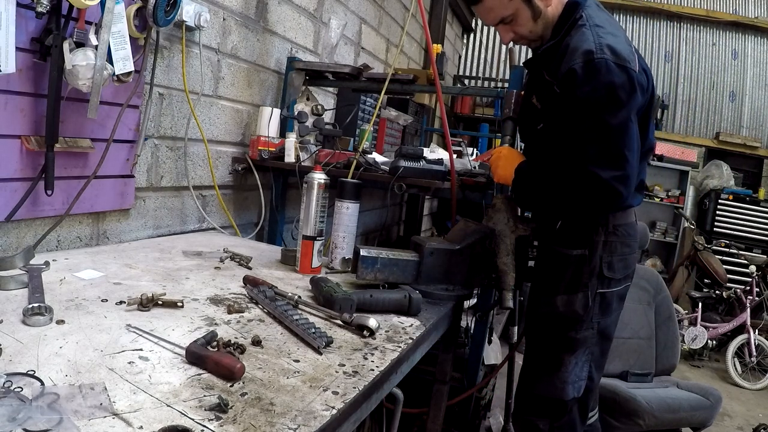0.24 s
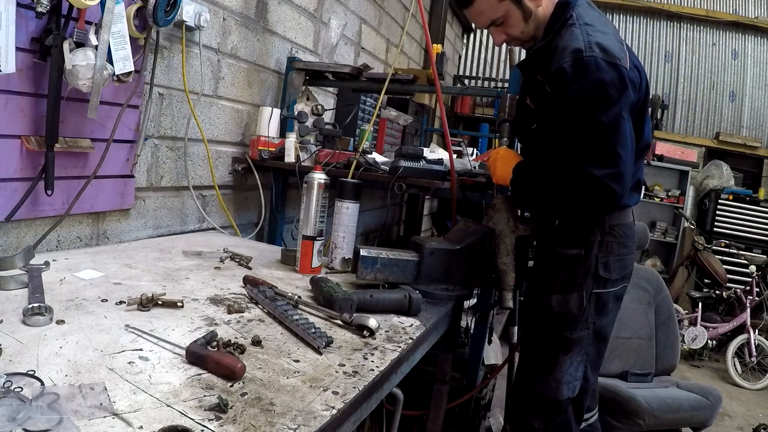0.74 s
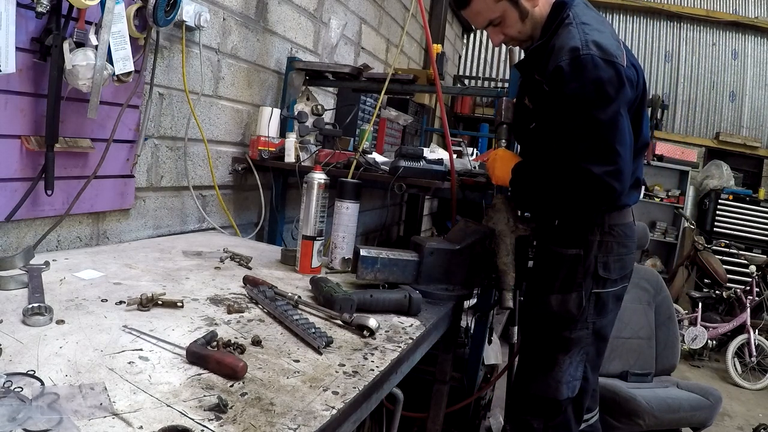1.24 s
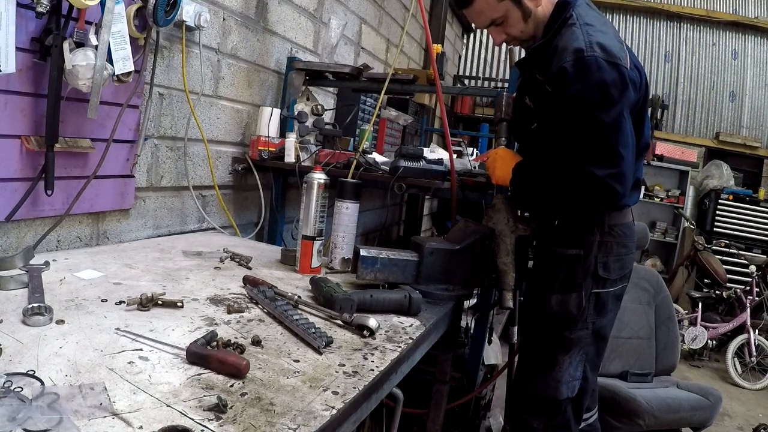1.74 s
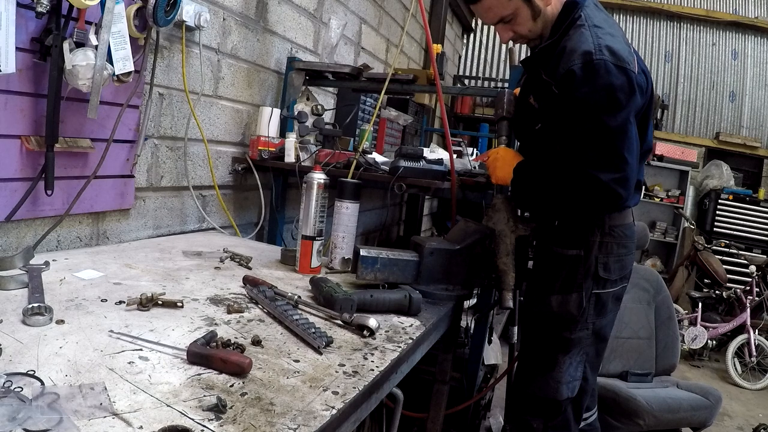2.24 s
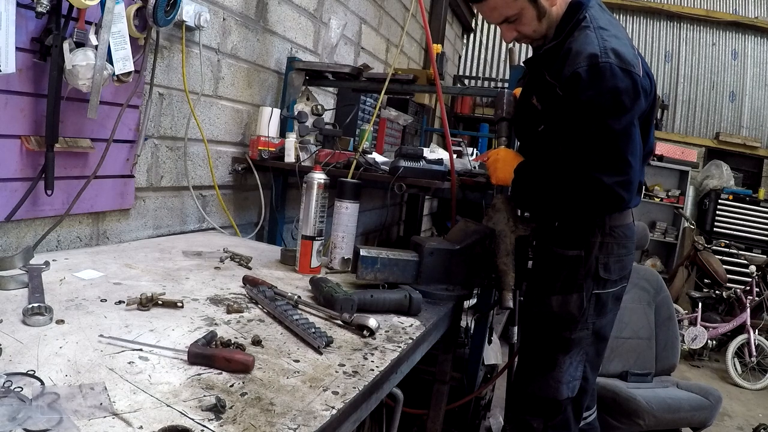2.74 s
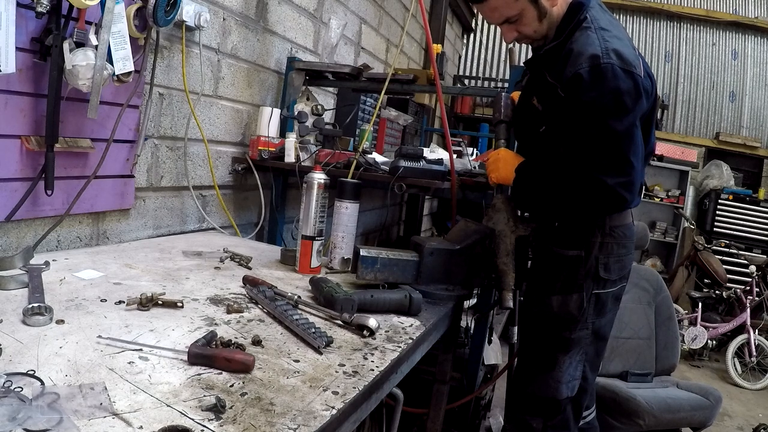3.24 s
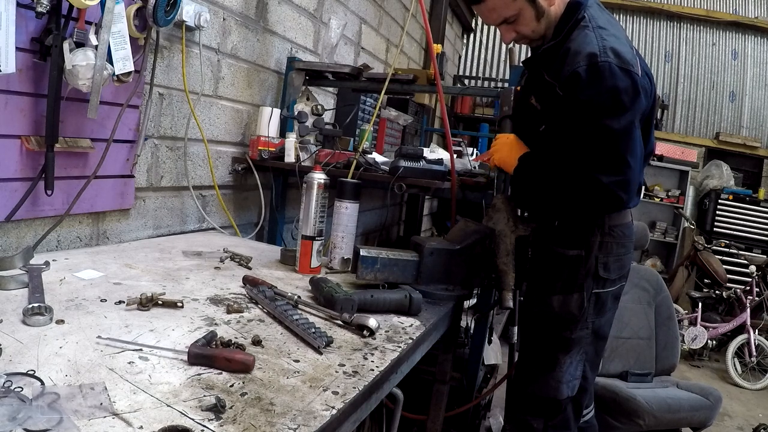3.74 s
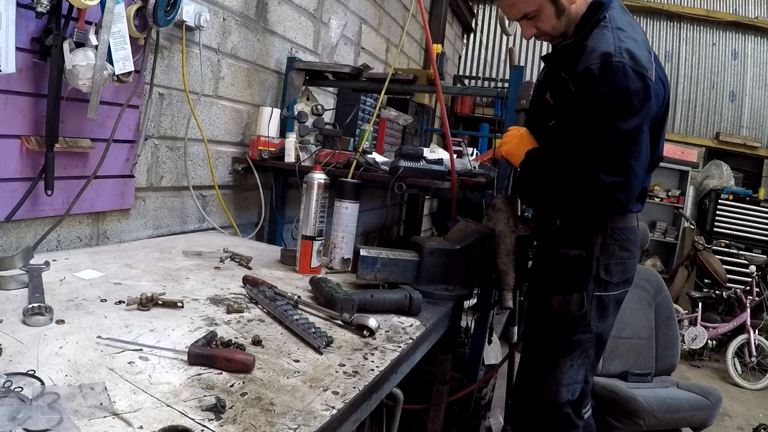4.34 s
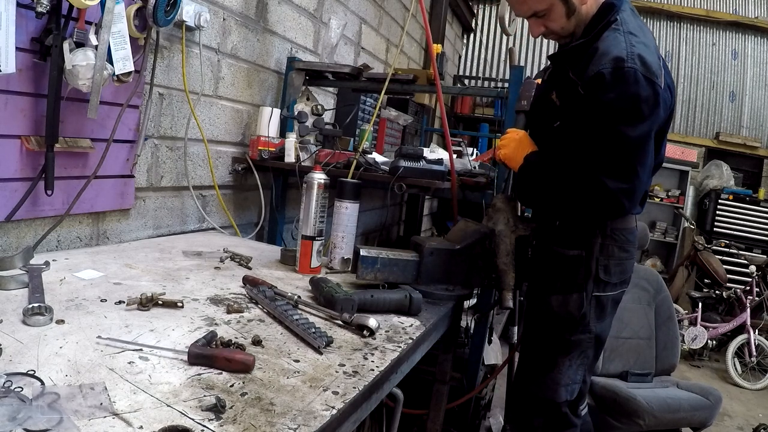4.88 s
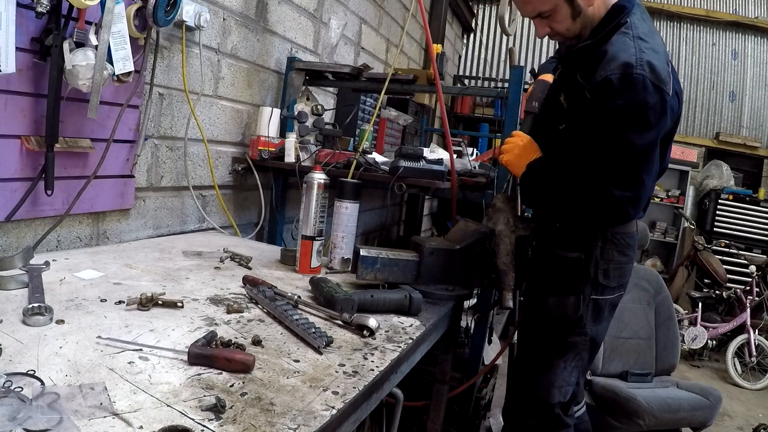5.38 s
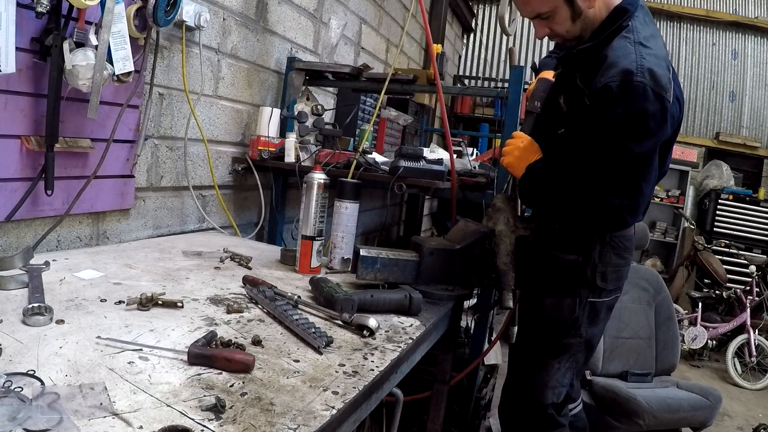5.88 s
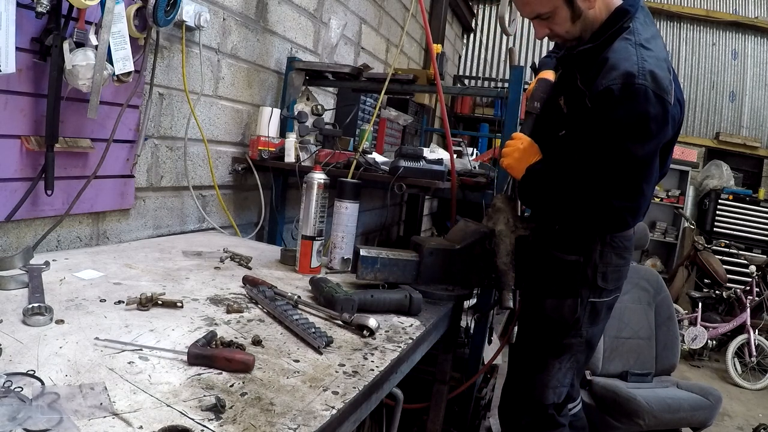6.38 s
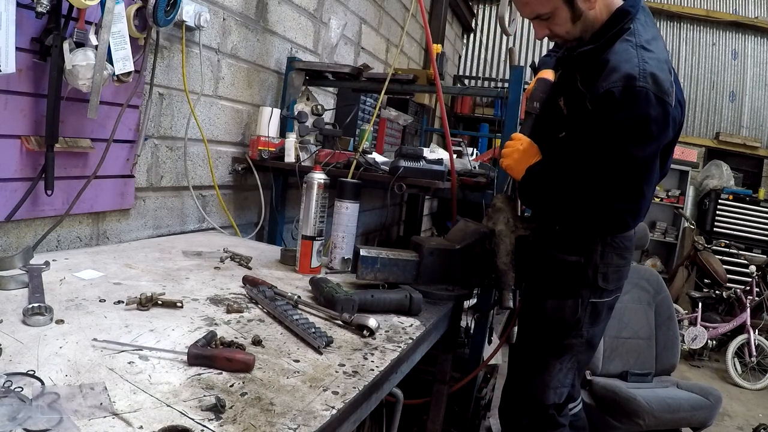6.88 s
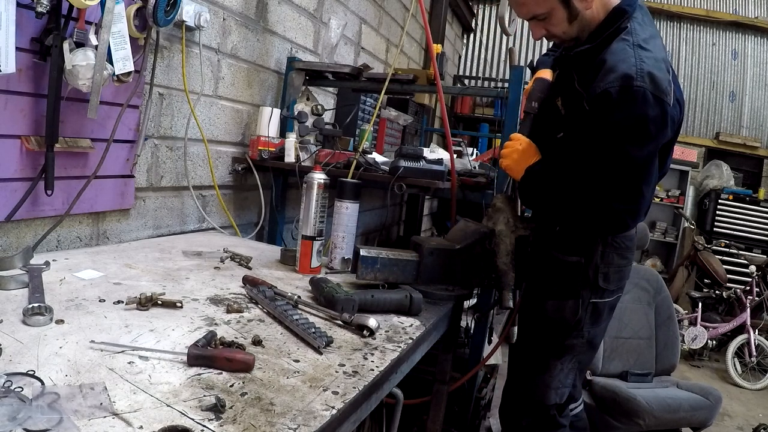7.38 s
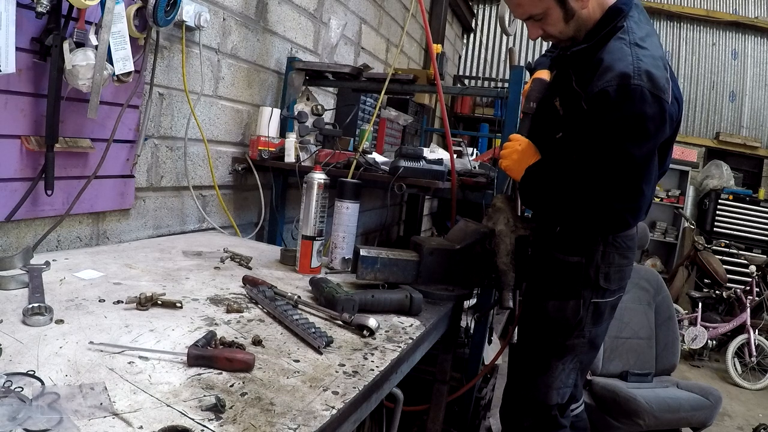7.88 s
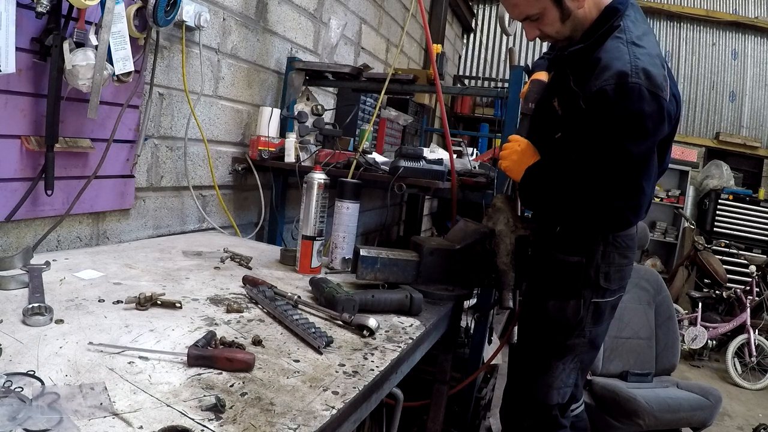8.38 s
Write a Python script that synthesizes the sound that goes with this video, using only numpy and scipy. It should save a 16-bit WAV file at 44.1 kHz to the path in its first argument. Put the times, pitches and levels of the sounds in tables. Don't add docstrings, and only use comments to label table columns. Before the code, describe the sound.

In a block-walled garage, a pneumatic chisel fires seven brief clanging bursts, rests while a compressor hums, then pounds steadily to the end.

```python
import sys
import numpy as np
from scipy import signal
from scipy.fft import rfft, irfft
from scipy.io import wavfile
from scipy.ndimage import uniform_filter1d

SR = 44100
rng = np.random.default_rng(int(sys.argv[2]) if len(sys.argv) > 2 else 0)


def invert_db(x):
    u = np.asarray(x, float) / 20
    return 10 ** u


def generate_wav(sig):
    pcm = np.round(np.clip(np.atleast_2d(sig).T, -1, 1) * 32767).astype(np.int16)
    wavfile.write(sys.argv[1], SR, pcm)


N = 380141
LEAD = 16384
SCATTER_DB = 2.27

# start_s, strength_db, chisel_slack (0 seated, 1 slack, below 0 leaning in)
RUN_EFFORT = [
    (5.77, 2.5, 0),
    (5.98, 3, .5),
    (6.4, 1.5, 1),
    (6.83, 1, 1),
    (7.25, 1, .35),
    (7.68, 1.5, 0),
    (7.9, 0.5, -.15),
    (8.33, 0.5, 0),
    (8.6, 0.5, -.1),
]


def level(x, db):
    return x * invert_db(db) / np.sqrt(np.mean(x ** 2))


def walk(rate):
    knots = rng.standard_normal(int(N / SR * rate) + 2)
    return np.interp(np.linspace(0, len(knots) - 1, N), np.arange(len(knots)), knots)


def even(x, width_hz):
    size = x.shape[-1]
    spectrum = rfft(x, 2 * size)
    smooth = uniform_filter1d(abs(spectrum) ** 2, 1 + int(width_hz * 2 * size / SR), axis=-1)
    flat = irfft(spectrum / np.sqrt(smooth))[..., :size]
    energy = np.sum(x ** 2, axis=-1, keepdims=True)
    return flat * np.sqrt(energy / np.sum(flat ** 2, axis=-1, keepdims=True))


def compressor():
    # multiple_of_crank_rate, level_db
    strong = [(1, -26), (3, 0.5), (4, -7.5), (5, -5.5), (6, 2.5), (7, -5.5), (8, -10.5), (9, -6),
              (10, -5.5), (11, -9), (12, -9.5), (13, -11.5), (14, -8), (15, -17), (18, -6.5), (20, -10.5),
              (28, -13.5), (30, -16.5), (32, -16.5), (36, -12), (37, -12), (38, -7.5), (39, -20.5),
              (41, -8.5), (43, -14), (44, -9), (45, -11), (48, -17.5), (50, -10), (51, -26)]
    # pitch_hz, level_db
    motor = [(29.5, -8.5), (118, -3), (136, -8.5)]
    # pitch_hz, density_db (per Hz)
    clatter_colour = [(15, -39), (30, -12), (119, 6), (300, -12), (741, -8), (1050, -13), (1340, -8.5),
                      (2600, -16), (3100, -20.5), (3500, -19), (5800, -24.5), (7700, -43.5), (11500, -46.5),
                      (15500, -60)]
    # pitch_hz, width_hz, level_db (over the clatter)
    whistle = [(8980, 710, 20.5), (13250, 300, 15)]
    crank_hz = 18.09
    drone_db, clatter_db = -16, -22
    weak_db, weak_spread_db = -23, 5

    turn = 2 * np.pi * np.cumsum(crank_hz * (1 + 0.001 * walk(1.5))) / SR
    orders = {k: weak_db + weak_spread_db * rng.standard_normal() for k in range(1, 56)}
    orders.update({round(k): db for k, db in strong})
    tones = [(k * turn, db) for k, db in orders.items()]
    tones += [(hz / crank_hz * turn, db) for hz, db in motor]
    drone = 0
    for phase, db in tones:
        drone = drone + invert_db(db + 2.0 * walk(6)) * np.cos(phase + rng.uniform(0, 2 * np.pi))

    f = np.fft.rfftfreq(N, 1 / SR)
    hz, db = np.transpose(clatter_colour)
    colour_db = np.interp(np.log(f + 1), np.log(hz), db)
    for centre_hz, width_hz, peak_db in whistle:
        colour_db = colour_db + peak_db / (1 + ((f - centre_hz) / width_hz) ** 2)
    clatter = irfft(rfft(rng.standard_normal(N)) * invert_db(colour_db), N)
    throb = invert_db(0.17 * np.cos(turn) + 0.29 * np.cos(2 * turn) + 0.5 * walk(18))
    return level(drone, drone_db) + level(clatter * throb, clatter_db)


def garage(echo_db, room_db, t60_s, valve_db):
    # delay_s, level_db
    echoes = [
        (.004, 2.5),
        (.0117, -.5),
        (.0195, -5),
        (.0272, -9),
    ]
    t = np.arange(SR) / SR
    build_up = np.clip((t - echoes[0][0]) / 0.0081, 0, 1)
    tail = even(rng.standard_normal(SR) * 1000 ** (-t / t60_s) * build_up, 40)
    path = invert_db(room_db) * tail / np.sqrt(np.sum(tail ** 2))
    path[0] = invert_db(valve_db)
    for delay_s, db in echoes:
        path[int(delay_s * SR)] += invert_db(db + echo_db)
    return path


def ring(hz, t60s, dbs, dense_db, dense_hz, dense_t60, size=16384):
    t = np.arange(size) / SR
    named = 0
    for k in range(len(hz)):
        decay = 1000 ** (-t / t60s[k])
        named = named + (-1) ** k * invert_db(dbs[k]) * np.sin(2 * np.pi * hz[k] * t) * decay
    band = signal.butter(2, [dense_hz, 0.92 * hz[-1]], "bandpass", fs=SR, output="sos")
    dense = signal.sosfilt(band, even(rng.standard_normal(size) * 1000 ** (-t / dense_t60), 220))
    return named + invert_db(dense_db) * dense * np.sqrt(np.sum(named ** 2) / np.sum(dense ** 2))


def struck(times, db, response, chatter_s, chatter_db, alike):
    alike = np.clip(alike, 0, .99)
    t = np.arange(1024) / SR
    fresh = rng.standard_normal((len(times), len(t)))
    shape = t * np.exp(-2 * t / chatter_s)
    pattern = signal.lfilter([np.sqrt(1 - alike ** 2)], [1, -alike], fresh, axis=0) * shape
    pattern *= invert_db(chatter_db) / np.sqrt(np.sum(shape ** 2))
    pattern[:, 0] = 1
    pattern = even(pattern, 400)
    first = signal.fftconvolve(pattern, response[None, :1024], axes=1)[:, :1024]
    gain = invert_db(db) / np.sqrt(np.mean(first ** 2, axis=1))
    force = np.zeros(N + LEAD + 4096)
    place = np.round(times * SR).astype(int)[:, None] + LEAD + np.arange(len(t))
    np.add.at(force, place, pattern * gain[:, None])
    return signal.fftconvolve(force, response)[LEAD:LEAD + N]


def pings(times):
    # pitch_hz, level_db, start_s (after the blow)
    tones = [
        (3648, -7, 0.0028),
        (4690, 2, 0.014),
    ]
    ping_db, slack_db = -15.5, -15.5
    free_s, reseat_t60_s = 0.012, 0.034
    t = np.arange(2048) / SR
    drift = 1 + .003 * rng.standard_normal((len(times), 1))
    tone = 0
    for hz, db, late_s in tones:
        onset = np.clip((t - late_s) / .002, 0, 1)
        tone = tone + invert_db(db) * onset * np.sin(2 * np.pi * hz * drift * t)
    at, db, slack = np.transpose(RUN_EFFORT)
    effort_db = np.interp(times, at, db + slack_db * slack)
    gain = invert_db(ping_db + effort_db + SCATTER_DB * rng.standard_normal(len(times)))
    tone = tone * gain[:, None] * 1000 ** (-np.clip(t - free_s, 0, None) / reseat_t60_s)
    out = np.zeros(N + SR)
    np.add.at(out, np.round(times * SR).astype(int)[:, None] + np.arange(len(t)), tone)
    return out[:N]


def strokes():
    # start_s, strength_db, bench_thump_db
    triggers = [
        (0.578, 2, 4),
        (1.078, 2, -2),
        (1.674, 11, 0),
        (2.0745, 9, -13),
        (2.8426, 7, -10),
        (3.2033, 6, -5),
        (5.695, 16, 0),
    ]
    # first_s, last_s, slow_start_s, strength_db, chisel_slack (0-1)
    trains = [
        (-.112, 0.0244, 0.0022, -0.5, 0.6),
        (0.067, 0.1536, 0, -2, 0.84),
        (0.608, 0.8, 0.011, -2, 0.53),
        (1.1101, 1.347, 0.0058, -0.5, 0),
        (1.6976, 1.8466, .002, 0, 0),
        (2.101, 2.256, 0, -0.5, 0),
        (2.3, 2.3826, 0, -0.5, 0.42),
        (2.4225, 2.6019, .0015, 0, 0.02),
        (2.8684, 2.9773, 0, 0.5, 0.17),
        (3.2276, 3.3054, 0.0083, -1.5, 0.27),
    ]
    # start_s,
    # strength_db, chisel_slack (0 seated, 1 slack; may go beyond either), air_lost_db
    fading = [(.1996, -3.5, 1.3, 13), (0.2752, -1.5, 1.3, 22), (.8433, 1, .2, 8), (0.9024, 2, .2, 15.5),
              (1.0001, -8, .2, 18), (1.4016, 1, -.3, 5.5), (1.4915, -9, -.1, 18), (1.9091, 3, 0, 24),
              (2.005, -18, -.4, 12), (2.642, -1, 0, -1), (2.7074, -2.5, 0, 7), (3.0209, -6.5, -.1, -7.5),
              (3.1076, -10, 0, 5), (3.3566, -15, .4, -10), (3.3992, -28, -.6, -1), (3.8006, -23, -.5, 11),
              (5.7203, -3, .3, -11)]
    # stroke_number, gap_ms
    run_gap = [(0, 36.19), (12, 35.56), (24, 34.63), (36, 35.26), (58, 35.77), (80, 36.82)]
    # bench_db, vise_db, part_db, chisel_db, exhaust_db
    click_db = (-32.5, -44, -48, -41.5, -51)
    burst_db = (-11.5, -11, -21.5, -22.5, -29)
    burst_slack_db = (1.5, -4, 7.5, 9, -0.5)
    run_db = (-13.5, -15.5, -19, -23, -33)
    run_slack_db = (-5, -6.5, -1, 6, -2.5)
    # bench, vise, part, chisel, exhaust (dB per dB)
    air_share = (0.87, 0.22, 0.25, 0.075, 0.61)
    stroke_s, run_start_s = .039, 5.7676
    filling_db = 3.5

    rows = []
    for first, last, slow, db, slack in trains:
        gaps = round((last - first - slow) / stroke_s)
        pulled = any(0 < first - pull[0] < stroke_s for pull in triggers)
        rows += [(first, db, slack, filling_db * pulled)]
        rows += [(s, db, slack, 0) for s in np.linspace(first + slow, last, gaps + 1)[1:]]
    s, db, slack, lost = np.array(sorted(rows + list(fading))).T[:, :, None]
    blows = np.hstack([s, db + burst_db + slack * burst_slack_db - lost * air_share])
    blows[:, 1:] += SCATTER_DB * rng.standard_normal((len(blows), len(burst_db)))
    clicks = []
    for s, db, thump_db in triggers:
        clicks.append((s, *(db + np.add(click_db, (thump_db, 0, 0, 0, 0)))))

    count = np.arange(run_gap[-1][0])
    gaps_ms = np.interp(count, *np.transpose(run_gap))
    times = run_start_s + np.cumsum(np.r_[0, gaps_ms]) / 1000
    at, db, slack = np.transpose(RUN_EFFORT)
    db, slack = (np.interp(times, at, column)[:, None] for column in (db, slack))
    run = np.hstack([times[:, None], db + run_db + slack * run_slack_db])
    return np.vstack([blows, clicks]), run


def hammer():
    # pitch_hz, t60_s, burst_db, run_db
    bench = [(54.5, 0.29, -4, -32), (90.6, 0.33, 8, -1.5), (131.15, 0.39, 6, 2.5), (202, 0.033, -14, -16),
             (247, 0.023, -22, -6), (298, 0.3, -4, -5), (374, 0.082, -23, -1)]
    vise = [(440.4, 0.1, -48, -9.5), (565, 0.05, 4, 3.5), (650, 0.016, -15, -16), (826, 0.034, -2, 6),
            (959, 0.022, 12, 6), (1134, 0.13, -34, -9.5), (1423, 0.011, 1, 1), (1534, 0.0073, -1, -39)]
    part = [(2100, 0.045, -26, -5.5), (2112, 0.021, -5.5, -1), (2368, 0.047, -6, -13),
            (3200, 0.026, -24, -25), (3143, 0.034, -7.5, -9), (3700, 0.016, 2.5, -2),
            (4108, 0.02, -9, -14.5)]
    chisel = [(4440, 0.024, 7, 9.5), (4740, 0.047, 0.5, 1), (4900, 0.039, -0.5, 5),
              (5138, 0.19, -1.5, -7.5), (5740, 0.035, 3, 2.5), (5940, 0.027, 1, 3), (5955, 0.022, 12.5, 8),
              (6500, 0.026, -9, -5), (6550, 0.028, -5, -10), (6400, 0.0091, 1, -2),
              (7390, 0.017, -13.5, 4.5), (7260, 0.022, 4, -43), (7710, 0.061, -25, -4),
              (7820, 0.02, 6, -16)]
    exhaust = [(8470, 0.0053, 9, 18), (9700, 0.033, -5, 1), (13060, 0.0074, 5, 9), (14600, .008, -6, -10),
               (15600, 0.0036, -25, -5)]
    # chatter_s, chatter_db (over the clean blow), likeness (stroke to stroke, 0-1),
    # lead_s (over the blow), dense_db (small modes), dense_lowest_hz, dense_t60_s, echo_db, room_db, room_t60_s
    contact = [
        (0.0028, -14, 0.76, 0.003486, 1.5, 93, 0.0012, 1, 4, 0.43),
        (0.001, -9.5, 0.97, 0.00303, -5, 796, 0.0093, -1.5, -1.5, 0.48),
        (0.0062, 6, 0.86, 0.000966, -8.5, 2370, 0.013, -8, -7, 0.83),
        (0.0085, 13.5, 0.69, .0008, -1.5, 4840, 0.007, -8.5, -4, 0.56),
        (0.0035, 6, 0, 0.00051, -0.5, 5600, 0.013, -7, -10, 0.56),
    ]
    # chatter_stretch (ratio), extra_chatter_db, delay_s, valve_thump_db
    poses = [
        (0.48, 7.5, .002, -3.5),
        (0.79, -0.5, .0001, -1),
    ]
    low_cuts_hz = (35, 140)

    out, played = 0, strokes()
    for k, modes in enumerate((bench, vise, part, chisel, exhaust)):
        chatter_s, chatter_db, alike, lead_s, *dense, echo_db, room_db, room_t60_s = contact[k]
        hz, t60s, *colours = np.transpose(modes)
        for rows, dbs, pose, cut_hz in zip(played, colours, poses, low_cuts_hz):
            stretch, loose_db, delay_s, valve_db = pose
            body = ring(hz, t60s, dbs, *dense)
            response = signal.fftconvolve(body, garage(echo_db, room_db, room_t60_s, valve_db))
            low_cut = signal.butter(4, cut_hz, "highpass", fs=SR, output="sos")
            response = signal.sosfilt(low_cut, response)
            times = rows[:, 0] - lead_s + delay_s
            blow_db = rows[:, k + 1] - 1.5
            out = out + struck(times, blow_db, response, stretch * chatter_s, chatter_db + loose_db, alike)
    return out + pings(played[1][:, 0])


def scene():
    # start_s, level_db
    ducking = [(0, -6.5), (.55, -15.5), (1.1, -13), (2.4, -9), (3.55, -11.5), (4.25, -2), (5.698, -2.5),
               (7, -13), (8.62, -3)]
    gain = invert_db(np.interp(np.arange(N) / SR, *np.transpose(ducking)))
    return (hammer() + gain * compressor())[None]


def low_pass(x):
    return signal.sosfilt(signal.butter(12, 15710, fs=SR, output="sos"), x)


def record(dry):
    bass_cut = signal.butter(1, 18, "highpass", fs=SR, output="sos")
    top_cut = signal.cheby1(8, 1, 14940, fs=SR, output="sos")
    heard = signal.sosfilt(top_cut, signal.sosfilt(bass_cut, dry))
    return low_pass(np.clip(heard, -1, 1))


dry = scene()
out = record(dry)
generate_wav(out)
```